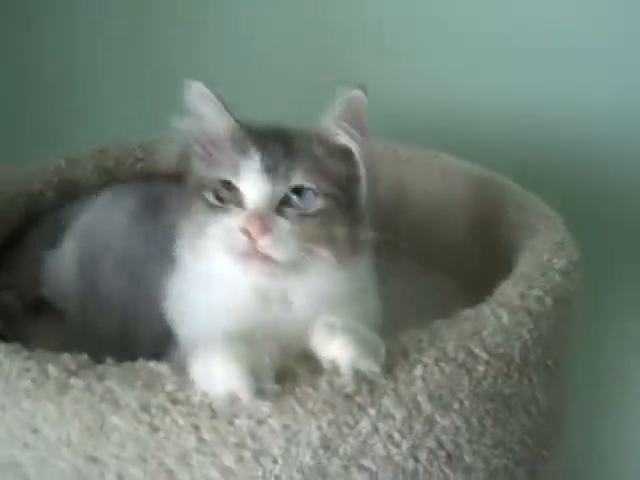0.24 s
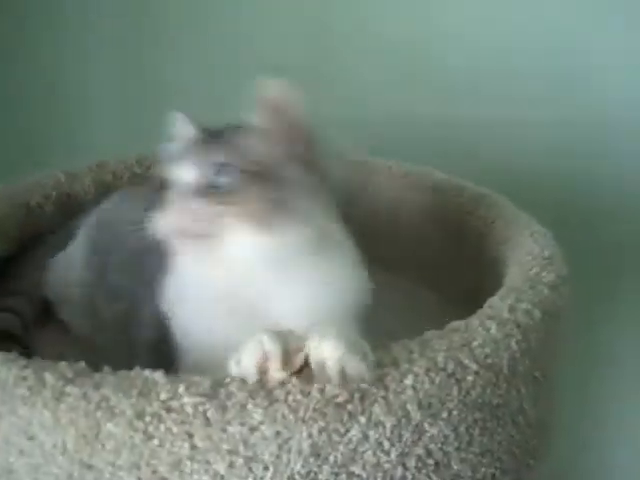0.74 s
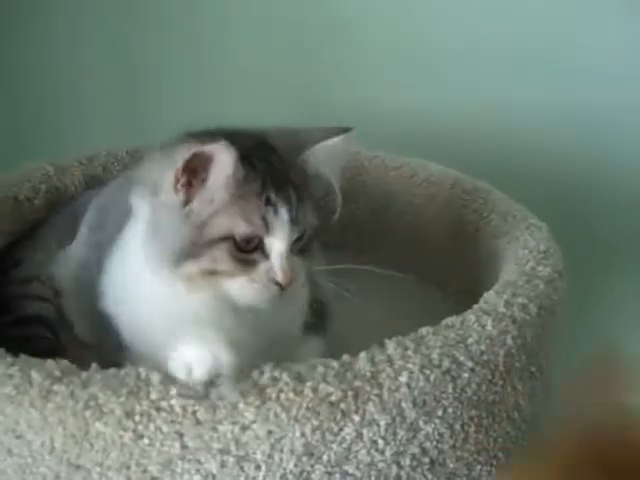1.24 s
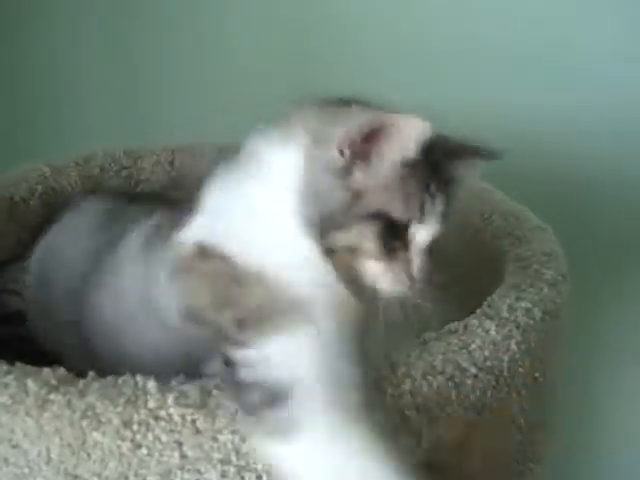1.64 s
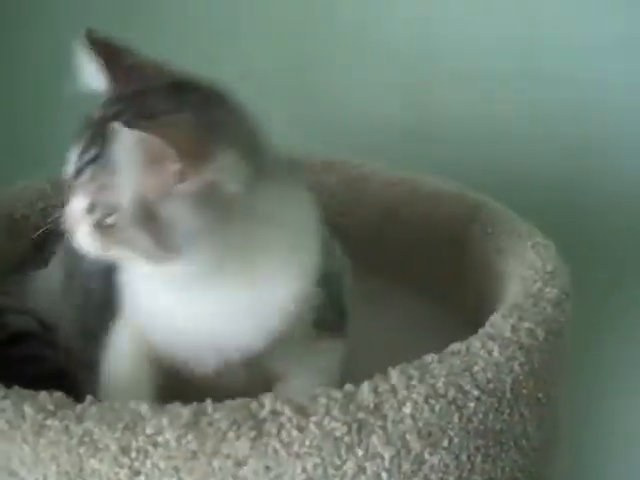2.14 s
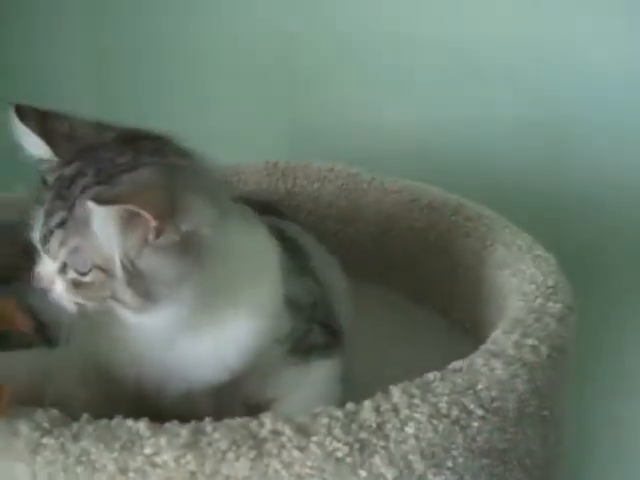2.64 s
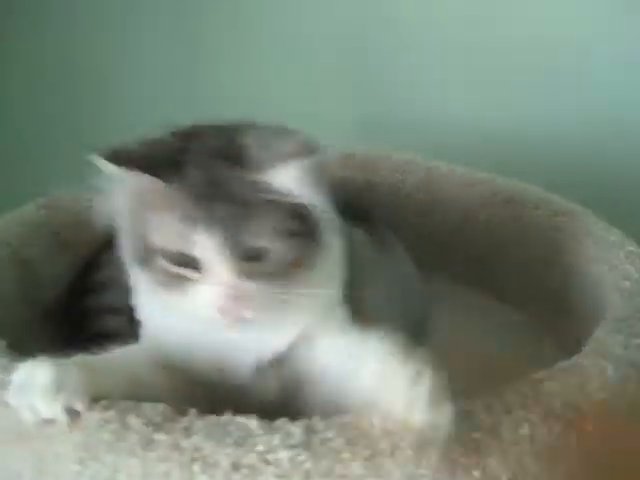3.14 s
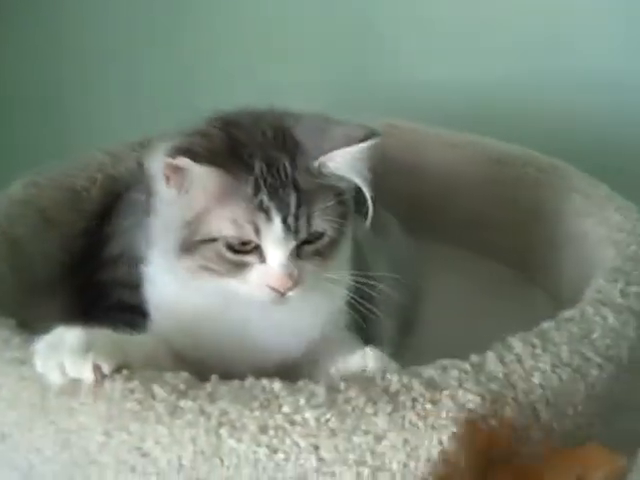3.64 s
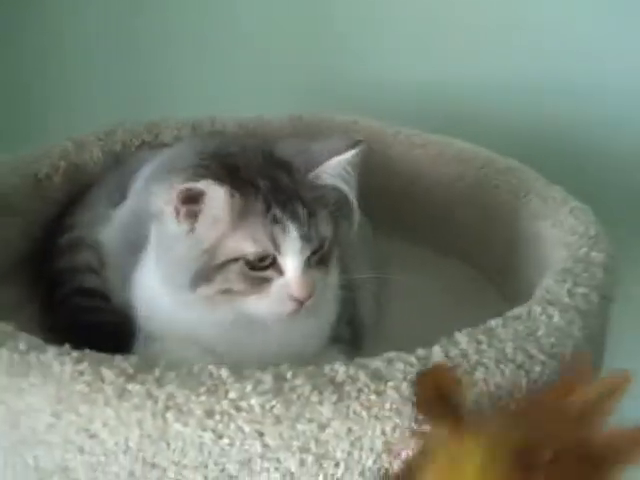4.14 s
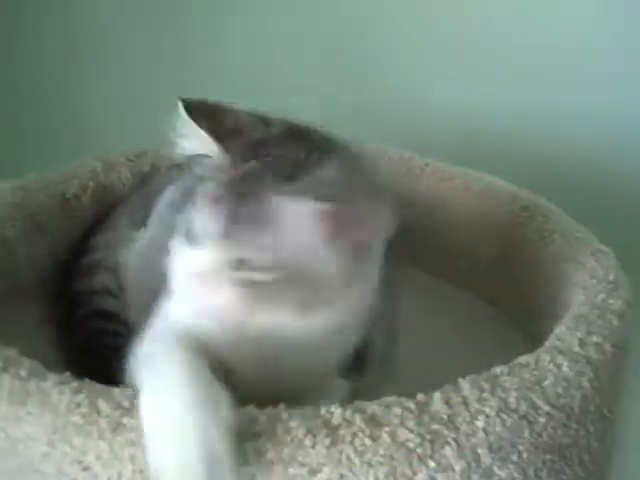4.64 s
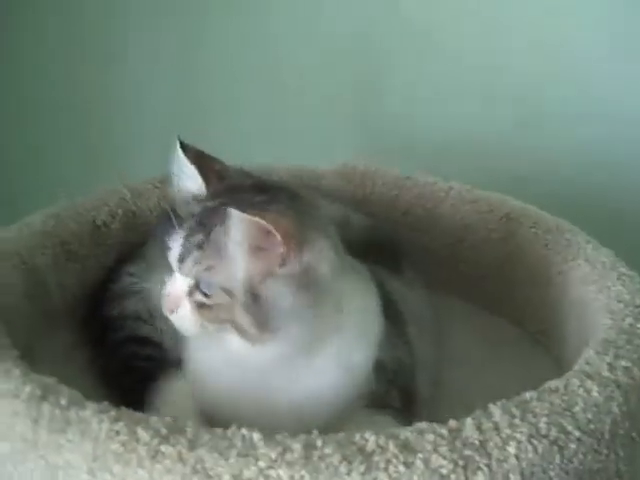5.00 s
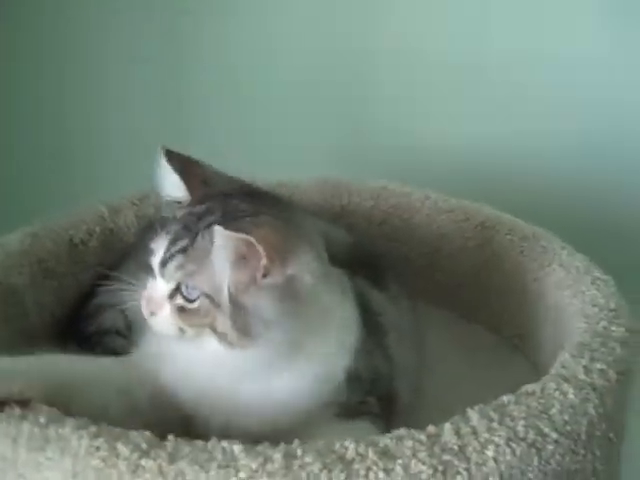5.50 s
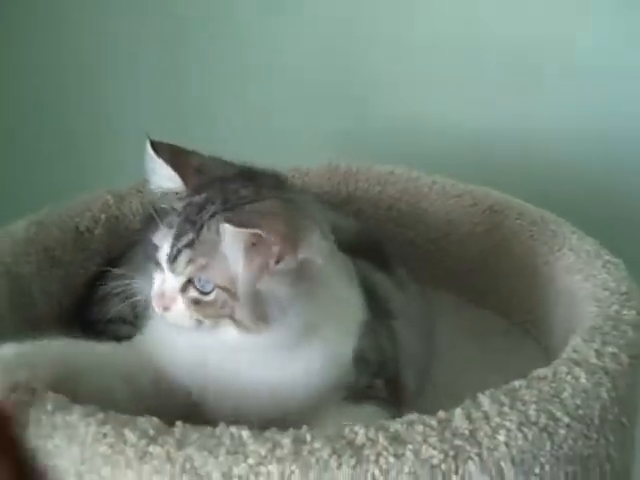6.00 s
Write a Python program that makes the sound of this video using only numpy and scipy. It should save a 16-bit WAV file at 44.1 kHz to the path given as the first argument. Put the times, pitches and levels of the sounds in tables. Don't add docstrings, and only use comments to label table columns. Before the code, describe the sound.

Crisp, dry feather rustles snap and die away as a kitten bats a wand toy in a quiet, live room with soft background hiss.

```python
import sys
import numpy as np
from scipy import signal
from scipy.fft import rfft, irfft, next_fast_len
from scipy.io import wavfile

SR = 44100
rng = np.random.default_rng(int(sys.argv[2]) if len(sys.argv) > 2 else 0)


def ratio(d):
    e = np.asarray(d, float) / 20
    return 10 ** e


def store_wav(level_fs):
    pcm = np.round(np.clip(np.atleast_2d(level_fs), -1, 1) * 32767)
    wavfile.write(sys.argv[1], SR, pcm.T.astype(np.int16))


N = 276066


def unit(x):
    return x / np.sqrt(np.mean(x ** 2) + 1e-20)


def along(points, hz):
    f, v = np.transpose(points)
    return np.interp(np.log(hz + 1), np.log(f + 1), v)


def filtered(x, response):
    m = next_fast_len(N + SR // 2)
    return irfft(rfft(x, m) * response(np.fft.rfftfreq(m, 1 / SR)), m)[:N]


def coloured(x, spectrum):
    return unit(filtered(x, lambda hz: ratio(along(spectrum, np.minimum(hz, 15000)))))


def resonant(x, modes):
    def response(f):
        total = 0
        for k, (centre, width, db) in enumerate(modes):
            damping = 1j * f * width
            total = total + (-1) ** k * ratio(db) * damping / (centre * centre - f * f + damping)
        return total
    return unit(filtered(x, response))


def crackle(per_s, spread_db, life_s):
    biggest_slip = 5
    size_db = spread_db * np.minimum(rng.exponential(size=N), biggest_slip)
    slips = (rng.random(N) < per_s / SR) * ratio(size_db)
    return signal.lfilter([1], [1, -np.exp(-1 / (life_s * SR))], slips) * rng.standard_normal(N)


def add(track, s, sound):
    track[round(s * SR):][:len(sound)] += sound


def hiss():
    # (frequency [Hz], level [dB per Hz])
    floor = [(12, -52), (20, -10), (33, -15.5), (123, -22), (210, -24.5), (310, -23), (660, -25.5),
             (780, -26.5), (1440, -28), (1760, -28.5), (2200, -30), (13200, -42.5), (16000, -53)]
    return ratio(-67.5) * coloured(rng.standard_normal(N), floor)


def stroke_db(s, db, rise_s, fall_s):
    late = np.arange(N) / SR - s
    return db - 20 * np.maximum(late / abs(fall_s), -late / abs(rise_s))


def effort():
    # (peak time [s], crisp level [dB], rise [s per 20 dB], fall [s per 20 dB])
    sways = [(0, -71, -0.15, 0.35), (.6, -74, 0.16, 0.13), (.72, -66.5, -0.09, 0.5),
             (.95, -63.5, 0.28, 0.08), (1.55, -78, 0.12, 0.14), (1.76, -69, -0.04, 0.36),
             (1.87, -56, 0.12, 0.0649), (1.95, -52.5, -0.01, 0.0835), (2.16, -62.5, .06, 0.1361),
             (2.462, -40, 0.0384, 0.0327), (3.05, -61, 0.2065, .5), (3.115, -58, 0.13, 0.19),
             (3.166, -41.5, 0.0569, 0.0362), (3.33, -51, 0.12, 0.1613), (3.93, -66, 0.02, 0.09),
             (4.29, -61, 0.13, 0.1636), (4.48, -57.5, 0.06, 0.57), (4.635, -46.5, .1, 0.0528),
             (5.3, -74, 0.27, 1), (5.67, -55, 0.1318, 0.1944), (6.11, -66, 0.06, -0.18),
             (6.2, -62.5, 0.16, 0.41), (6.255, -56, 0.146, 0.96)]
    # (peak time [s], crisp level [dB], body over crisp [dB])
    jerks = [
        (1.019, -38.5, -11),
        (1.797, -46, -8.5),
        (2.395, -49, -16),
        (3.186, -38.5, -0.5),
        (3.518, -44, -9.5),
        (4.564, -36, -10.5),
        (4.654, -31, -12.5),
        (5.508, -41.5, -11.5),
    ]
    # (start [s], crisp level [dB], fall [s per 20 dB], body over crisp [dB])
    settles = [
        (1.043, -42, 0.2159, -8),
        (1.83, -55.5, 0.197, -2.5),
        (2.49, -58, 0.26, -2.5),
        (3.22, -50, 0.32, -5),
        (3.55, -64.5, 0.43, 4.5),
        (4.05, -78, .5, 11.5),
        (4.69, -59, 0.31, 2),
        (5.54, -56.5, 0.31, -6),
    ]
    sway_body_db, body_lingers, body_rest_db = -7, 1.24, -80
    strokes = [(s, db, 0.0134, .04, body_db) for s, db, body_db in jerks]
    strokes += [(*row, sway_body_db) for row in sways]
    strokes += [(s, db, 0.026, fall, body_db) for s, db, fall, body_db in settles]
    crisp, body = np.zeros(N), np.full(N, ratio(2 * body_rest_db))
    for s, db, rise, fall, body_db in strokes:
        crisp += ratio(2 * stroke_db(s, db, rise, fall))
        body += ratio(2 * stroke_db(s, db + body_db, rise, body_lingers * fall))
    return np.sqrt(crisp), np.sqrt(body)


def feathers(crisp, body):
    # (frequency [Hz], level [dB per Hz])
    crisp_colour = [(1760, -36), (3000, -3.5), (4380, -7), (6620, -2.5), (7620, -1), (9070, -3.5),
                    (10700, 3), (12500, 4), (15200, 1.5), (16000, -79)]
    # (frequency [Hz], level [dB per Hz])
    body_colour = [(300, -23.5), (600, -12.5), (1200, -8.5), (2000, -1.5), (3500, -5), (6000, -4.5),
                   (9000, -16.5)]
    shared = crackle(per_s=2500, spread_db=1.0, life_s=0.000936)
    small = crackle(per_s=880, spread_db=0.0, life_s=0.00029)
    large = crackle(per_s=2300, spread_db=4.5, life_s=0.00123)
    fine = coloured(shared + small, crisp_colour)
    coarse = coloured(1.8 * shared + large, body_colour)
    return crisp * fine + body * coarse


def barbs(crisp):
    # (time [s], peak level [dB])
    further_snaps = [(1.008, -39), (1.0616, -27), (1.1328, -34), (1.8383, -33), (1.8702, -37), (1.9279, -39),
                     (1.9675, -39), (1.9793, -39), (2.401, -40), (2.409, -40), (2.4676, -27), (2.6181, -45),
                     (2.9257, -49), (3.0131, -47), (3.1966, -29), (3.2324, -34), (3.5431, -37), (3.9476, -46),
                     (4.4798, -45), (4.5415, -36), (4.5707, -26), (4.5935, -31), (4.6291, -30), (4.6424, -31),
                     (4.6474, -28), (4.6709, -30), (5.4083, -53), (5.6722, -39), (5.8301, -45), (6.1185, -49)]
    per_s, over_db, spread_db = 40, 10, 2
    centre_hz, length_ms = 12570, 1.4
    when, size = rng.random((round(per_s * N / SR), 2)).T
    rustle_db = 20 * np.log10(crisp[(when * N).astype(int)])
    db = rustle_db + over_db - spread_db * np.log(1 - size)
    rows = [*further_snaps, *zip(.001 + when * N / SR, db)]
    chance = rng.random((len(rows), 2))
    return [(*row, centre_hz * (.85 + .3 * pitch), length_ms * (0.61 + 0.78 * length))
            for row, (pitch, length) in zip(rows, chance)]


def room(x):
    # (frequency [Hz], decay time t60 [s], level [dB])
    walls = [(200, 0.1, -3.5), (686, 1, 1.5), (2000, 0.944, -1.5), (6000, 0.879, -1.5), (12400, 0.351, 7)]
    wet, hop = np.zeros(N + 2 * SR), 2048
    fade = np.hanning(2 * hop + 1)[:-1]
    x = np.pad(x, (hop, 2 * hop))
    for start in range(0, N + hop, hop):
        hz, t, z = signal.stft(rng.standard_normal(SR * 2 // 3), SR, nperseg=256)
        t60 = along([(row[0], row[1]) for row in walls], hz)[:, None]
        db = along([(row[0], row[2]) for row in walls], hz)[:, None]
        tail = signal.istft(z * ratio(db - 60 * t / t60), SR, nperseg=256)[1]
        echo = signal.fftconvolve(fade * x[start:start + 2 * hop], tail / np.linalg.norm(tail))
        wet[start:start + len(echo)] += echo
    return wet[hop - 200:][:N]


def blows():
    # (time [s], peak level [dB], frequency [Hz])
    hits = [
        (0.1008, -54, 1640),
        (1.155, -55, 444),
        (1.535, -57, 1490),
        (1.559, -54, 1590),
        (3.8883, -47.5, 468),
        (3.887, -46.5, 2080),
        (4.013, -44.5, 2000),
        (4.141, -54.5, 1550),
    ]
    out, t = np.zeros(N + SR), np.arange(4096) / SR
    for s, db, hz in hits:
        t60 = 0.00105 + 9 / hz
        add(out, s, ratio(db + 4 - 60 * t / t60) * np.sin(2 * np.pi * hz * t))
    return out[:N]


def snaps(rows):
    near, far, t = np.zeros(N + SR), np.zeros(N + SR), np.arange(1024) / SR
    dull = signal.butter(2, [700, 3800], "band", fs=SR)
    for s, db, hz, ms in rows:
        body_db = -23.5 + 4 * ms
        burst = rng.standard_normal(len(t)) * np.exp(-(t / (ms * .0008)) ** 1.5)
        pair = np.array([burst, np.linalg.norm(burst) * (t == 0)])
        ring = signal.lfilter(*signal.iirpeak(min(hz, 17000), 2, SR), pair)
        bright = ring + 0.077 * np.diff(pair, prepend=0)
        body = signal.lfilter(*dull, pair)
        both = bright / abs(bright[0]).max() + ratio(body_db) * body / abs(body[0]).max()
        direct, thrown = ratio(db - 0.5 - 3.2 * (hz < 5500)) * both
        add(near, s - .0003, direct)
        add(far, s, thrown)
    return near[:N], far[:N]


def puffs():
    # (time [s], peak level [dB], push or pull [signed factor])
    gusts = [
        (2.433, -49, 0.95),
        (2.453, -50.5, 0.98),
        (3.1803, -41.5, -0.92),
        (3.1861, -36.5, -1),
        (3.1866, -30, 1),
        (4.6539, -24, 0.967),
        (4.656, -32, 0.75),
        (4.6583, -37, -1.33),
        (4.666, -34, -1.35),
        (5.5052, -48, 0.92),
    ]
    t = np.arange(N) / SR
    return sum(way * ratio(db) * np.exp(-((t - s) / 0.000227) ** 2) for s, db, way in gusts)


def ticks():
    # (time [s], peak level [dB])
    clicks = [
        (2.7018, -48.5),
        (2.7072, -64),
        (2.7108, -61),
        (2.9225, -62.5),
    ]
    # (frequency [Hz], level [dB], decay time t60 [s])
    clasp = [(2200, -5, .008), (3300, 0, .014), (3330, -18, .2), (4950, -22, .15), (4900, -4, .01),
             (6300, -7, .01)]
    out, t = np.zeros(N + SR), np.arange(4096) / SR
    for s, db in clicks:
        for hz, level, t60 in clasp:
            uneven_db = rng.normal(0, 1.1)
            add(out, s, ratio(db + 1 + level + uneven_db - 60 * t / t60) * np.sin(2 * np.pi * hz * t))
    return out[:N]


def drag():
    # (time [s], scrape level [dB])
    scrape = [
        (3.886, -53.5),
        (4.18, -63),
        (4.25, -66.5),
        (4.276, -68.5),
        (4.408, -77.5),
        (4.45, -79),
    ]
    # (frequency [Hz], width [Hz], level [dB])
    pile = [(1153, 835, -2), (1736, 302, 2.5), (2080, 298, -0.5), (2725, 410, -4.5), (3413, 646, -6.5)]
    # (frequency [Hz], width [Hz], level [dB])
    post = [(305, 145, -3.5), (494, 232, -4)]
    t = np.arange(N) / SR
    scrape_db = np.interp(t, *np.transpose(scrape))
    hollow_db = -3 - 29.5 * np.maximum(t - scrape[0][0], 0)
    touching = np.clip((t - 3.882) / 0.005, 0, 1) * (t < scrape[-1][0])
    slips = crackle(per_s=3200, spread_db=0.5, life_s=0.00135)
    return touching * ratio(scrape_db) * (resonant(slips, pile) + ratio(hollow_db) * resonant(slips, post))


def scene():
    # (time [s], peak level [dB], centre [Hz], length [ms])
    loud_snaps = [(0.7351, -40, 12900, 1.7), (0.8413, -49, 12100, 0.9), (0.9255, -42, 12800, 1.3),
                  (1.0166, -25, 12900, 2.0), (1.0332, -22, 10800, 0.8), (1.0532, -27, 13700, 1.5),
                  (1.0936, -29, 13500, 1.5), (1.1305, -26, 14800, 1.4), (1.7923, -30, 14000, 0.8),
                  (1.8419, -31, 13100, 0.9), (2.3927, -40, 11000, 1.4), (2.4329, -23, 13400, 0.9),
                  (2.451, -25, 13400, 1.7), (2.4564, -23, 10200, 1.1), (2.923, -46, 5000, 1.5),
                  (3.1581, -27, 4300, 2.0), (3.1694, -26, 10400, 1.0), (3.1813, -22, 10100, 2.0),
                  (3.186, -19, 11200, 2.6), (3.309, -33, 13500, 0.9), (3.5134, -36, 14000, 2.6),
                  (3.5307, -30, 14800, 0.9), (4.515, -32, 11500, 1.9), (4.5652, -26, 12100, 1.1),
                  (4.5816, -27, 14800, 2.0), (4.6115, -28, 12400, 0.9), (4.6522, -17.5, 12800, 2.5),
                  (4.6558, -19, 12700, 2.2), (5.5048, -25, 13400, 1.0), (6.2427, -42, 13700, 1.3)]
    crisp, body = effort()
    near, far = snaps([*loud_snaps, *barbs(crisp)])
    taps = blows() + ticks()
    rubs = feathers(crisp, body) + drag()
    echoes = room(ratio(-5.5) * far + taps + ratio(-4.5) * rubs)
    return (near + taps + puffs() + rubs + echoes + hiss())[None]


def roll_off(x):
    return signal.sosfilt(signal.butter(12, 16670, fs=SR, output="sos"), x)


def record(dry):
    # (time [s], size [notches])
    cuts = [(1.0185, 1), (1.842, 1), (2.4329, 1), (2.452, 1), (3.1585, 1), (3.1868, 2), (3.189, 1),
            (4.5583, 1), (4.5798, 1), (4.6525, 2), (4.654, 2), (4.659, 1), (5.5052, 1)]
    # (start [s], length [notches])
    climbs = [
        (.1442, 1),
        (1.5059, 1),
        (2.1853, 1),
        (2.843, 2),
        (3.5788, 4),
        (5.0225, 7),
        (5.8606, 1),
    ]
    moves = np.zeros(N)
    for s, count in cuts:
        moves[round(s * SR)] += count
    for s, count in climbs:
        steps_s = s + .0342 * np.arange(count)
        moves[np.round(steps_s * SR).astype(int)] -= 1
    gain = ratio(-.5 * np.cumsum(moves))
    offset = signal.lfilter([.1], [1, -.9], gain - gain[0])
    thump = -.052 * signal.lfilter([1, -1], [1, -np.exp(-1 / (.075 * SR))], offset)
    top_hz = 15960
    heard = filtered(dry[0] * gain, lambda hz: 1 / (1 + (hz / top_hz) ** 300))
    mix = (heard + thump - .0005)[None]
    return roll_off(mix)


dry = scene()
out = record(dry)
store_wav(out)
```